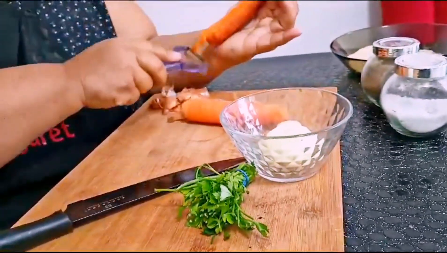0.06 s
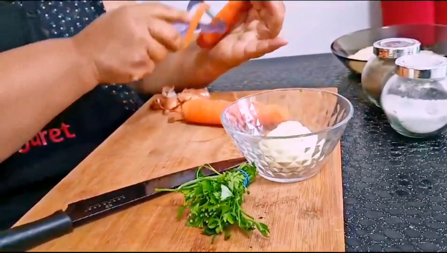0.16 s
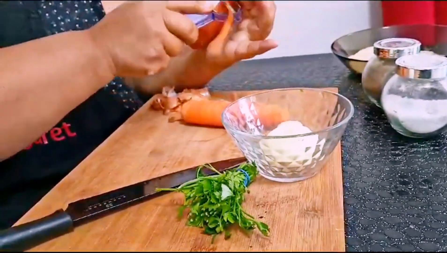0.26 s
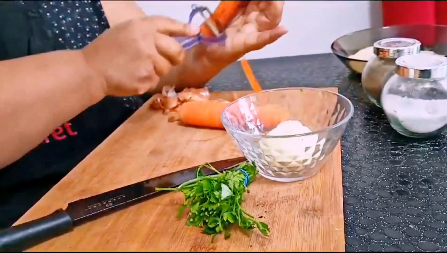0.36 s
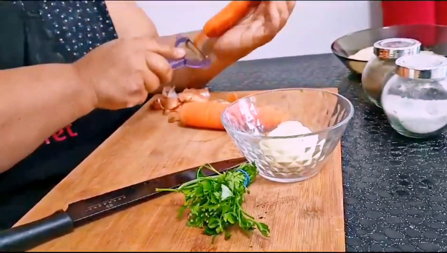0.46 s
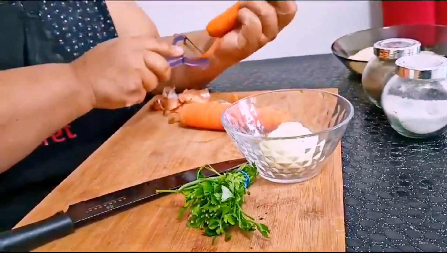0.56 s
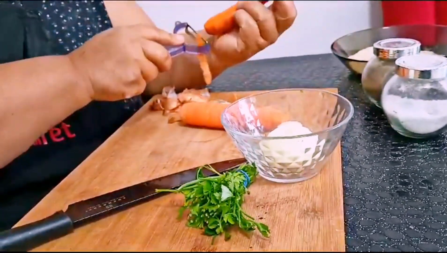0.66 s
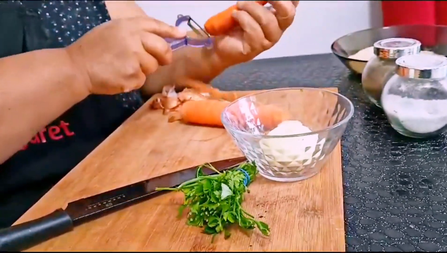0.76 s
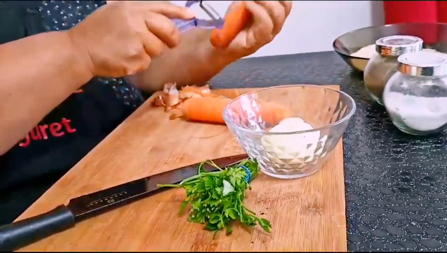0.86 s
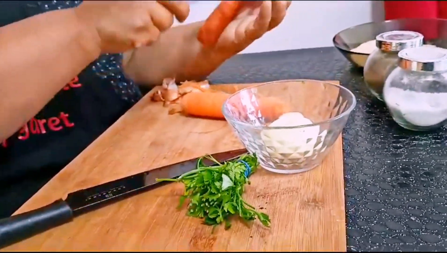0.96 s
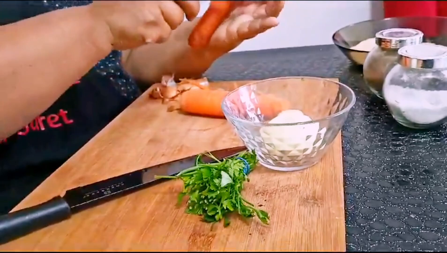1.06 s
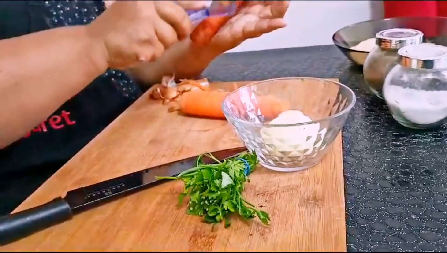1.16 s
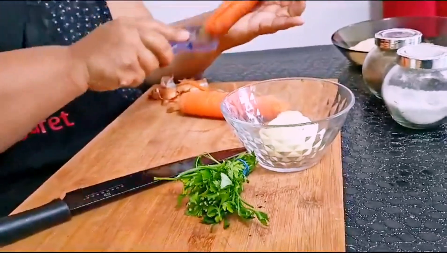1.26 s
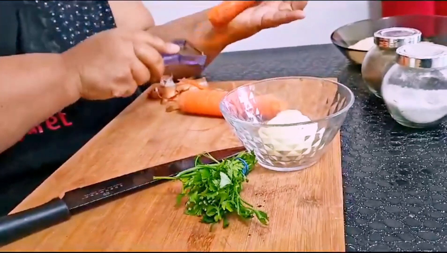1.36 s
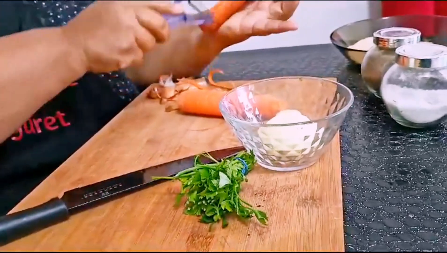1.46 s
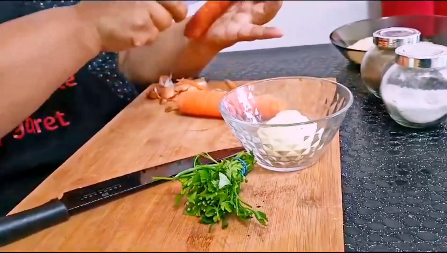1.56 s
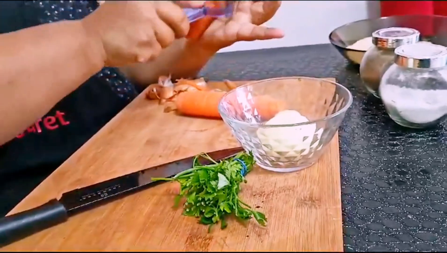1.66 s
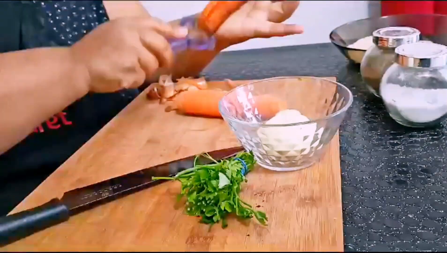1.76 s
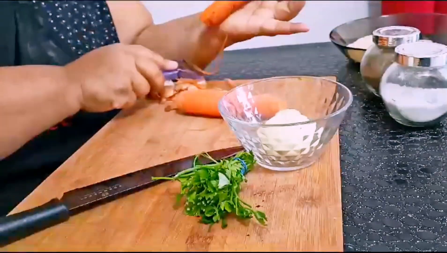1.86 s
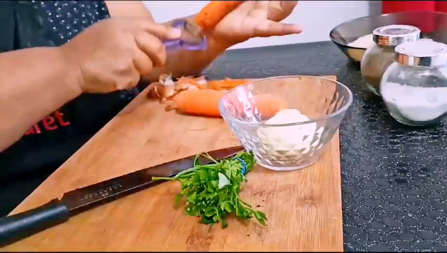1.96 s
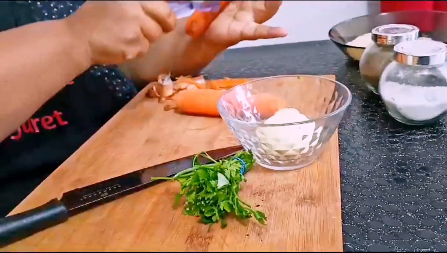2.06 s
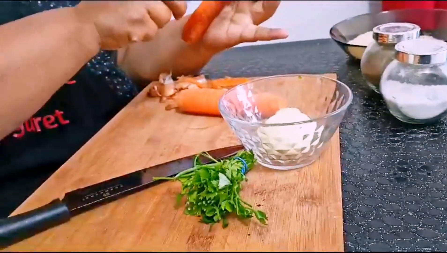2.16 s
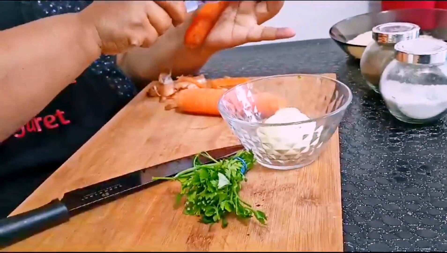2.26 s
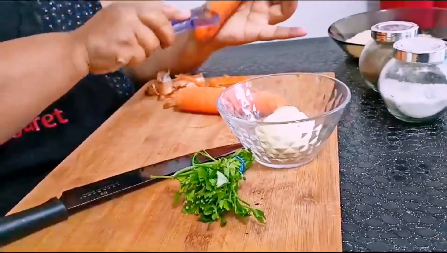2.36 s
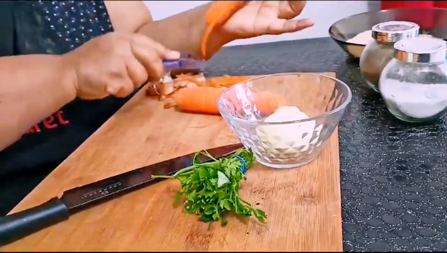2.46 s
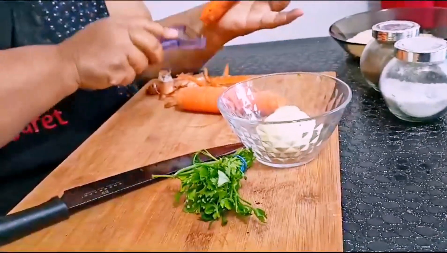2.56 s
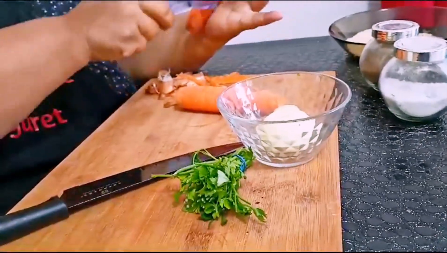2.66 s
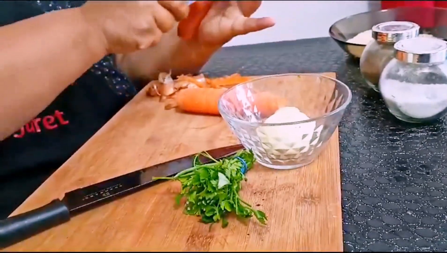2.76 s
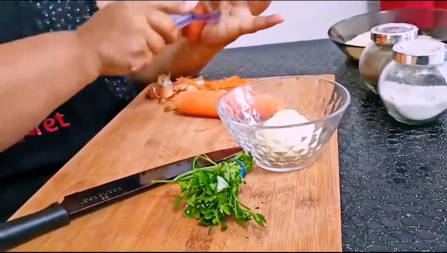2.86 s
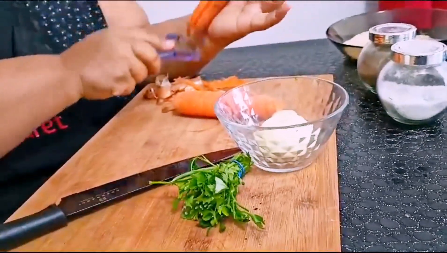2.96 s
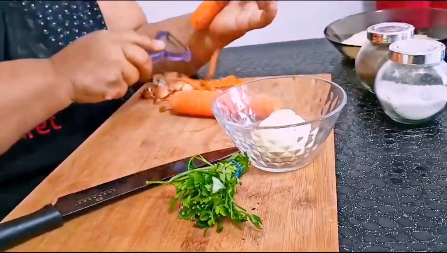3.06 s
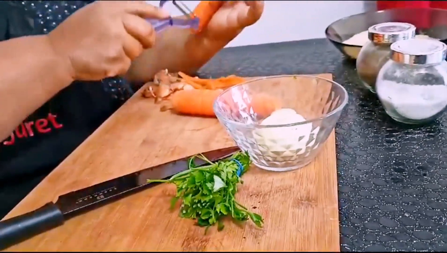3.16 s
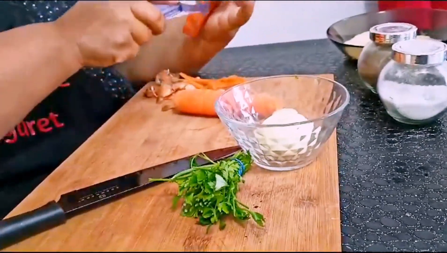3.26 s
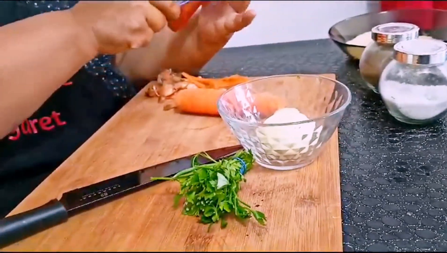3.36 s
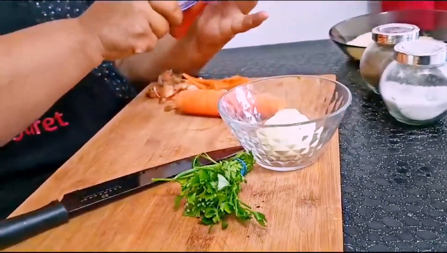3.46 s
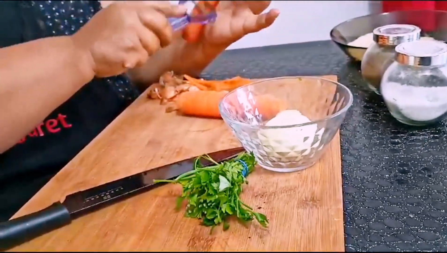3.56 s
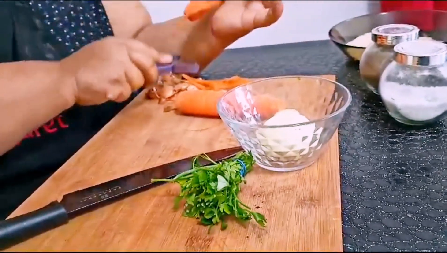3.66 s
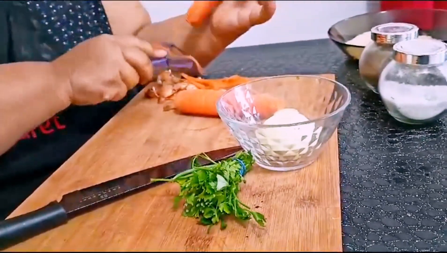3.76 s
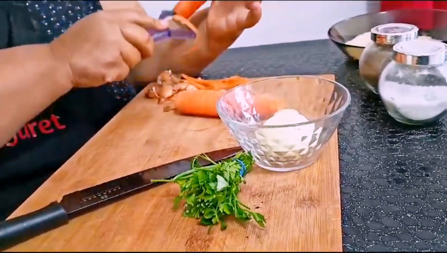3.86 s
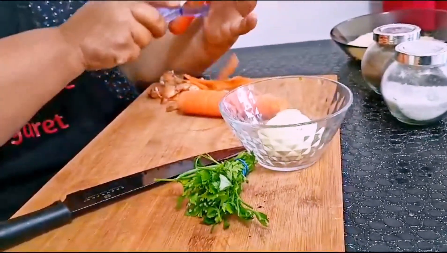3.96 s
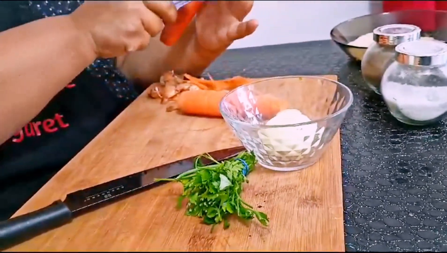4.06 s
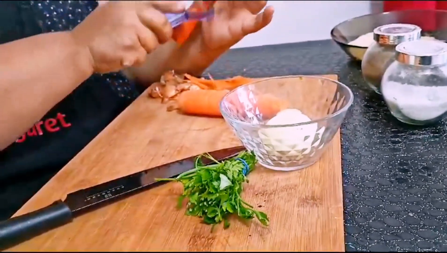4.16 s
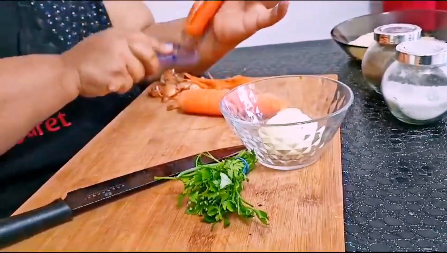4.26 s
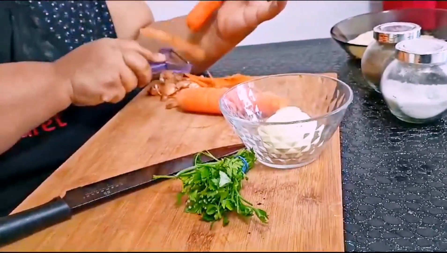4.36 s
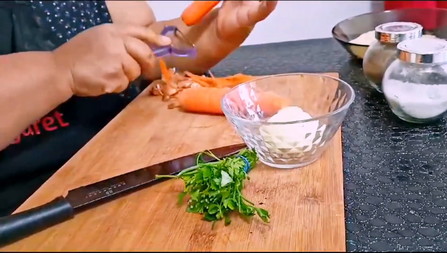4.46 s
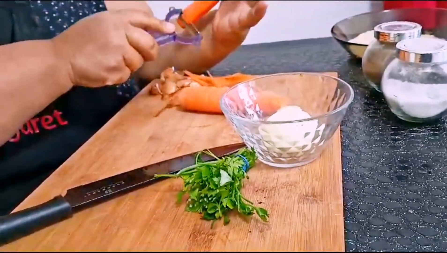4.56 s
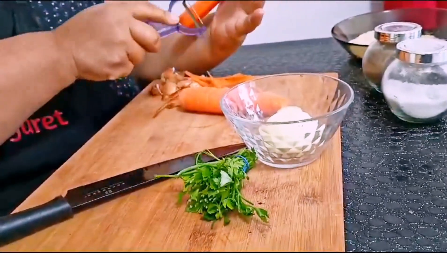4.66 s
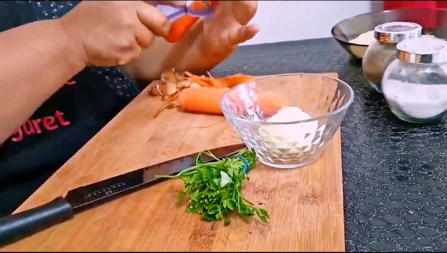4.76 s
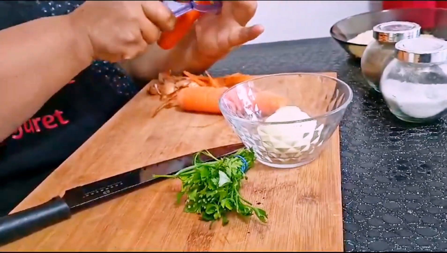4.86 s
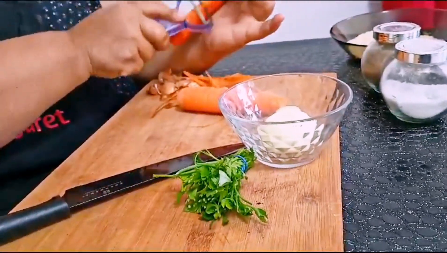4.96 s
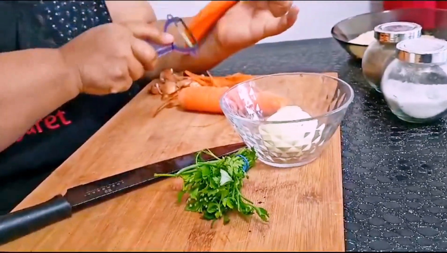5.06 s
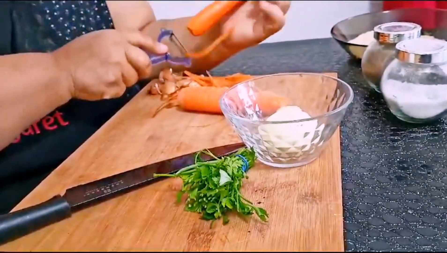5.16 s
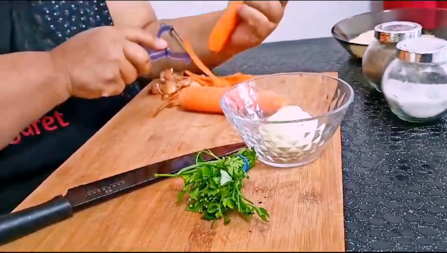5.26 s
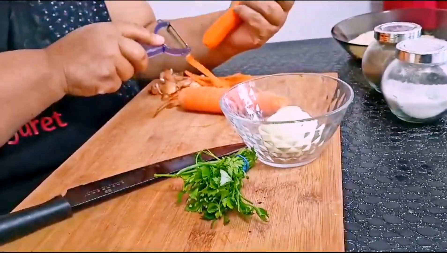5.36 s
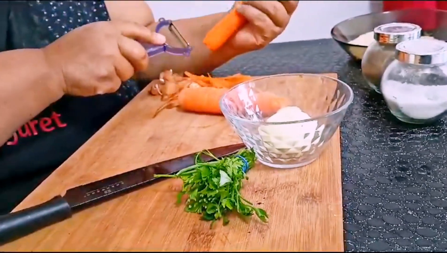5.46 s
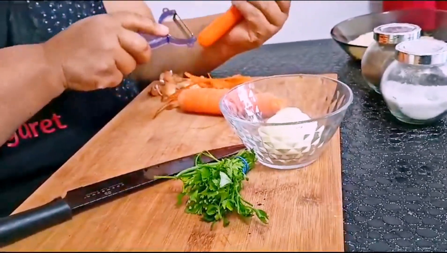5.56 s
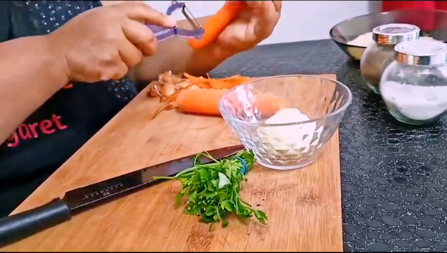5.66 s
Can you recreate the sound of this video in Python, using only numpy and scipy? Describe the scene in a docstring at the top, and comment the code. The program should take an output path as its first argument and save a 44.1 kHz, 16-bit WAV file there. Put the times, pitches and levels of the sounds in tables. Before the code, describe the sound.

Rhythmic juicy scrapes and clacks of a loose peeler blade on a carrot, with peel pattering onto wood and a faint appliance hum.

```python
"""A short wet rasp and a bright snap: a swivel peeler flicks off a carrot in a small kitchen.
Stroke after stroke the loose blade clacks onto the carrot, rasps through the skin with a juicy fizz
and the odd squeak, and snaps back as it leaves the tip. In between it rattles, strips of peel patter
onto a wooden board, and the board takes one dull tap. An appliance hums underneath, and a noise
suppressor turns the pauses down."""
import sys
import numpy as np
from scipy import signal
from scipy.fft import rfft, irfft, next_fast_len
from scipy.io import wavfile
from scipy.ndimage import uniform_filter1d

SR = 44100
rng = np.random.default_rng(int(sys.argv[2]) if len(sys.argv) > 2 else 0)


def pcm_store(signal):
    """Save signal as 16-bit PCM."""
    levels = np.round(np.clip(np.atleast_2d(signal), -1, 1) * 32767)
    wavfile.write(sys.argv[1], SR, levels.astype(np.int16).T)


N = 251487


def amp(db):
    """Decibels to gain."""
    return 10 ** (np.asarray(db) / 20)


def unit(x):
    """Scales to rms 1."""
    return x / np.sqrt(np.mean(x ** 2) + 1e-20)


def curve_at(points, hz):
    """Reads a breakpoint curve on a log-frequency axis."""
    f, value = np.transpose(points)
    return np.interp(np.log(hz + 1), np.log(f + 1), value)


def add(mix, s, sound):
    """Mixes a sound in at s seconds."""
    start = round(s * SR)
    sound = sound[max(-start, 0):]
    part = mix[max(start, 0):][:len(sound)]
    part += sound[:len(part)]


def colour(x, eq):
    """Applies an EQ curve of f/Hz, level/dB points."""
    size = next_fast_len(len(x) + 2048)
    gain = amp(curve_at(eq, np.fft.rfftfreq(size, 1 / SR)))
    return irfft(rfft(x, size) * gain, size)[:len(x)]


def drift(size, hz):
    """Smooth random modulation, rms about 1, moving at rates up to about hz."""
    span = next_fast_len(size + SR // 4)
    f = np.fft.rfftfreq(span, 1 / SR)
    spectrum = rfft(rng.standard_normal(span)) / (1 + (f / hz) ** 4)
    return unit(irfft(spectrum, span))[:size]


def resonate(x, hz, *widths_hz):
    """Resonators in series, one for each width, on a pitch that may glide."""
    turn = np.exp(2j * np.pi * np.cumsum(hz * np.ones(len(x))) / SR)
    for width in widths_hz:
        r = np.exp(-np.pi * width / SR)
        x = 2 * (turn * signal.lfilter([1 - r], [1, -r], x / turn)).real
    return x


def crackle(size, per_s, spread_db):
    """A random train of tiny clicks, a few much louder than the rest."""
    strengths = amp(spread_db * np.minimum(rng.exponential(1, size), 4))
    return unit(strengths * rng.choice([-1, 1], size) * (rng.random(size) < per_s / SR))


def appliance(air_db=-60.5, phase_wander=0.2):
    """The background bed: three wavering orders of a motor over a rush of air."""
    # motor orders: f/Hz, level/dB, waver/dB
    orders = [(143.6, -61.5, 1.5), (214.7, -56, 1.5), (287, -71.5, 3)]
    # EQ of the air: f/Hz, level/dB
    air_eq = [(20, -45), (40, -24), (65, -3.5), (100, -1.5), (160, 0), (300, -2.5), (480, -3), (800, -14.5),
              (1300, -21), (1600, -20), (1770, -12), (1980, -21.5), (2500, -23), (4500, -27), (6000, -33.5),
              (7500, -24), (10000, -35), (15500, -29.5)]
    t = np.arange(N) / SR
    hum = np.zeros(N)
    for hz, db, waver_db in orders:
        peak = np.sqrt(2) * amp(db + waver_db * drift(N, 9.8))
        hum += peak * np.sin(2 * np.pi * hz * t + phase_wander * waver_db * drift(N, 2.9))
    return hum + amp(air_db) * unit(colour(rng.standard_normal(N), air_eq))


def kitchen(x, wet_db=-2.0, onset_s=0.0028):
    """Small-room reverb: a dense tail in which each band dies at its own speed."""
    # reverb bands: f/Hz, t60/s, level/dB
    bands = [(200, 0.6, -3.5), (990, 0.44, -2.5), (2960, 0.37, 0.5), (6350, 0.33, -2.5), (7160, 0.29, 2.5),
             (10050, 0.27, -3.5), (15000, 0.23, 0.5)]
    decay_times, tail_eq = np.array(bands)[:, :2], np.array(bands)[:, ::2]
    t = np.arange(SR // 2) / SR
    hz, frame_s, noise = signal.stft(rng.standard_normal(len(t)), SR, nperseg=256)
    fade = amp(-60 * frame_s / curve_at(decay_times, hz)[:, None])
    tail = signal.istft(noise * fade, SR, nperseg=256)[1][:len(t)]
    tail *= 1 - np.exp(-(t / onset_s) ** 2)
    response = amp(wet_db) * colour(tail / np.linalg.norm(tail), tail_eq)
    return signal.fftconvolve(x, response)[:N]


def knock(level_db):
    """A dull tap rings the wooden board briefly."""
    # board modes: f/Hz, level/dB, t60/s
    modes = [(480, -20, 0.0094), (910, -9, 0.011), (1450, -2, 0.012), (1640, -9, 0.016),
             (4500, -4.5, 0.019)]
    t = np.arange(SR // 10) / SR
    return sum(amp(level_db + db - 60 * t / t60) * np.sin(2 * np.pi * hz * t) for hz, db, t60 in modes)


def peel(db, decay_s, slap_s=0.0045, attack_s=0.00047):
    """A wet strip slaps down and settles with a fading patter."""
    # EQ of peel on wood: f/Hz, level/dB
    patter_eq = [(300, -15), (800, 1.5), (2000, -0.5), (5000, -1.5), (6000, -4), (7500, 3), (11000, -1),
                 (15000, -5)]
    t = np.arange(SR // 2) / SR
    patter = unit(colour(crackle(len(t), per_s=880, spread_db=4.5), patter_eq))
    envelope = (np.exp(-t / decay_s) + np.exp(-t / slap_s)) * (1 - np.exp(-t / attack_s))
    return amp(db) * patter * envelope


def squeak(length_s, start_hz, end_hz, db, width_hz=260):
    """Fast, irregular stick-slip on the wet skin gives a fuzzy, gliding tone."""
    size = round(length_s * SR)
    tone = resonate(rng.standard_normal(size), np.linspace(start_hz, end_hz, size), width_hz, width_hz)
    return amp(db) * unit(tone * signal.windows.tukey(size, 0.5))


def squelch(size, low_hz=1550, high_hz=5000, width_hz=220, wander=0.048, swell_db=5.5, count=5):
    """Pockets of juice under the strip ring at wandering pitches, each coming and going."""
    out = np.zeros(size)
    for centre_hz in np.geomspace(low_hz, high_hz, count) * rng.uniform(0.905, 1.09, count):
        hz = centre_hz * (1 + wander * drift(size, 8.5))
        swell = amp(swell_db * drift(size, 19))
        out += swell * unit(resonate(rng.standard_normal(size), hz, width_hz, width_hz))
    return unit(out)


def clack(blow_db, thud_db, balance_db, bounce_s=0.0015, contact_s=0.00083, rise_s=0.00045,
          chatter_s=0.0067, detune=0.011, grip_db=1.2):
    """One blade pivot strikes, then the other, then both chatter; thud lifts the handle's low modes."""
    # peeler modes: f/Hz, width/Hz, level within the group/dB
    peeler_modes = [(1686, 960, 2.5), (2630, 1050, 4), (3127, 127, -2.5), (4500, 8100, -1.5),
                    (4934, 520, -4.5), (7440, 480, -5.5), (7920, 1480, -1), (10450, 590, -5.5),
                    (12000, 1600, -6.5), (14180, 770, -1), (15800, 1600, 3)]
    # crossovers between the low, middle, high and top groups of modes: f/Hz
    crossovers = [3800, 6000, 9200]
    t = np.arange(round(0.04 * SR)) / SR
    first, second = (np.exp(-age / contact_s) * (1 - np.exp(-age / rise_s))
                     for age in (t, np.maximum(t - bounce_s, 0)))
    contact = 0.73 * first + second
    modes = np.array(peeler_modes)
    group = np.searchsorted(crossovers, modes[:, 0])
    modes[:, 0] *= 1 + detune * rng.standard_normal(len(modes))  # the grip shifts from blow to blow
    modes[:, 2] += grip_db * rng.standard_normal(len(modes))
    levels_db = blow_db + np.array(balance_db) + thud_db * np.array([1, 0.65, 0, 0])
    out = np.zeros(len(t))
    for k, group_db in enumerate(levels_db):
        chatter = (0.24 if k == 0 else 0.07) * np.exp(-t / chatter_s)
        blow = (contact / contact.max() + chatter) * rng.standard_normal(len(t))
        ringing = sum(amp(db) * unit(resonate(blow, hz, width, 2 * width))
                      for hz, width, db in modes[group == k])
        out += amp(group_db) * unit(ringing)
    return out / np.sqrt(10)  # the energy sits in the first tenth


def pressure(t, landing_db, bite_s, cut_db, skid_db=-7, settle_s=0.05, swell_db=36.5):
    """Envelope of the scrape: the landing skid dies away while the cut swells and holds."""
    skid = amp(landing_db + skid_db) * np.exp(-t / settle_s)
    cut = amp(cut_db - swell_db * np.maximum(1 - t / bite_s, 0) ** 2)
    return np.hypot(skid, cut)


def scrape(t, fizz_db, thrum_db, judder=0.19, waver=0.035, thrum_growth_db=9,
           blade_hz=3050, strip_start_hz=4900, strip_end_hz=2900, sizzle_hz=13500):
    """The blade cuts skin and bursts cells in uneven slips: mid rasp, airy fizz and low thrum."""
    # EQ of the tearing skin: f/Hz, level/dB
    rasp_eq = [(200, -42), (700, -26), (1150, -7.5), (1450, -11.5), (1750, 2), (2100, 1.5), (2600, 3.5),
               (3050, 3.5), (3600, -13), (4300, -4), (5050, -3.5), (5600, -13), (6500, -16), (8500, -36)]
    # EQ of the bursting cells: f/Hz, level/dB
    fizz_eq = [(1000, -58), (5000, -27), (6200, -6.5), (6700, -7), (7300, 1), (8500, -0.5), (9600, -5),
               (10500, -2.5), (11700, -8.5), (12600, -3), (13400, -6), (14200, -5.5), (15500, 3),
               (16500, -12.5)]
    # EQ of the carrot's body: f/Hz, level/dB
    thrum_eq = [(40, -43), (150, -13), (350, -3), (520, -2), (800, -4), (1150, -6), (1500, 1.5),
                (2500, -31)]
    size = len(t)
    travel = np.linspace(0, 1, size)
    speed = np.sin(np.pi * travel ** 1.34) ** 2  # fastest past the middle
    slips = np.exp(judder * drift(size, 87))
    skin = slips * crackle(size, per_s=4500, spread_db=5.0)
    cells = slips * crackle(size, per_s=21000, spread_db=3.5)
    # the blade holds its pitch; the strip of peel rings lower as it grows longer
    strip_hz = np.linspace(strip_start_hz, strip_end_hz, size) * (1 + waver * drift(size, 20))
    strip = np.sqrt(speed) * unit(resonate(cells, strip_hz, 800, 800))
    blade = np.sqrt(2 * travel) * unit(resonate(slips * rng.standard_normal(size), blade_hz, 390, 390))
    rasp = unit(colour(skin, rasp_eq)) + 0.65 * strip + 0.67 * blade + 0.74 * squelch(size)
    wavering_hz = sizzle_hz * (1 + waver * drift(size, 16))
    sizzle = speed * unit(resonate(slips * rng.standard_normal(size), wavering_hz, 550))
    fizz = unit(colour(cells, fizz_eq)) + 0.97 * sizzle
    thrum = colour(slips * crackle(size, per_s=2500, spread_db=2.5), thrum_eq)
    thrum_gain = amp(thrum_db + thrum_growth_db * travel)  # grows towards the carrot's free tip
    sound = unit(rasp) * amp(-3.5) + unit(fizz) * amp(fizz_db - 1.5) + unit(thrum) * thrum_gain
    return sound * signal.windows.tukey(size, 0.02)


def peeling(graze_s=0.008, firm_db=-36.5, thud_per_db=0.47):
    """The dry action: clack, scrape and snap for each stroke, with the small sounds around them."""
    # strokes: landing t/s, leaving t/s, landing level/dB, time to full bite/s, cut level/dB,
    # fizz trim/dB, thrum trim/dB, snap level/dB, snap's thud boost/dB
    strokes = [(-0.2, 0.0218, -42, .12, -46.5, 5, -20, -39.5, 3),
               (0.2684, 0.485, -33.5, 0.1, -46.5, 0, -18, -34, 1.5),
               (1.1078, 1.3244, -36.5, .11, -46, 3, -18, -35.5, 0.5),
               (1.6437, 1.8331, -38.5, 0.085, -45.5, 1, -20, -32, -0.5),
               (2.269, 2.4692, -60.5, 0.19, -46.5, 1, -18, -33.5, -2),
               (2.7842, 3.009, -39.5, .11, -46, 1, -20.5, -31, -4.5),
               (3.4373, 3.6969, -44, 0.22, -44.5, -0.5, -23, -30, -6),
               (4.101, 4.3121, -64, 0.14, -46.5, -1.5, -19, -32.5, -3.5),
               (4.868, 5.1579, -46.5, 0.14, -48, 0, -14.5, -32, -4.5)]
    # rattles of the loose blade, mostly between strokes; the one at 3.432 s is the blade's first touch of a
    # double landing: t/s, level/dB, thud boost/dB
    rattles = [(0.195, -59, 3.5), (0.609, -59, -6), (1.481, -62, 7.5), (3.4324, -49, -7),
               (4.501, -69.5, 11), (4.606, -62, 0), (5.526, -67.5, -12)]
    # blade squeaks: t/s, length/s, start f/Hz, end f/Hz, level/dB
    squeaks = [(0.273, 0.019, 3600, 3250, -44), (0.274, 0.04, 2090, 1970, -51),
               (0.368, 0.17, 3090, 2920, -52), (1.195, 0.042, 7750, 7800, -54),
               (2.781, 0.038, 2260, 2090, -55), (4.938, 0.024, 3220, 3000, -57.5)]
    # peel landing on the board: t/s, level/dB, decay/s
    peels = [(0.826, -62.5, 0.063), (1.484, -61, 0.039), (3.096, -50, 0.012), (3.216, -61.5, 0.017),
             (4.075, -63, 0.01), (4.502, -65, 0.15)]
    # mode balance, blade seated on the carrot or swinging free: low/dB, middle/dB, high/dB, top/dB
    seated, free = (-5.5, -2.5, 0.5, 1.5), (-0.5, -5, 0, 2)
    mix = np.zeros(N)
    for land_s, leave_s, landing_db, bite_s, cut_db, fizz_db, thrum_db, snap_db, thud_db in strokes:
        landing_thud_db = thud_per_db * (firm_db - landing_db)  # softer landings are duller
        add(mix, land_s, clack(landing_db, landing_thud_db, seated))
        start_s = land_s - graze_s  # the edge skids just before the blade seats
        t = np.arange(start_s, leave_s, 1 / SR) - start_s
        add(mix, start_s, scrape(t, fizz_db, thrum_db) * pressure(t, landing_db, bite_s, cut_db))
        add(mix, leave_s, clack(snap_db, thud_db, free))
    for s, db, thud_db in rattles:
        add(mix, s, clack(db, thud_db, free))
    for s, *settings in squeaks:
        add(mix, s, squeak(*settings))
    for s, db, decay_s in peels:
        add(mix, s, peel(db, decay_s))
    add(mix, 3.094, knock(level_db=-38.5))
    return mix


def scene(directions=2):
    """The peeler radiates differently each way: one way is heard direct, all of them fill the room."""
    ways = [peeling() for _ in range(directions)]
    reverb = sum(kitchen(way) for way in ways) / np.sqrt(directions)
    return (ways[0] + reverb + appliance())[None]


def record(dry, split_hz=900, shut_db=-72, bass_open_db=-47, treble_open_db=-58,
           bass_depth_db=12.0, treble_depth_db=5, bass_lag_s=0.027, cutoff_hz=15900):
    """A noise suppressor ducks the pauses, the bass deeper and more slowly; then a steep low-pass."""
    x = dry[0]
    bass = signal.sosfiltfilt(signal.butter(2, split_hz, fs=SR, output="sos"), x)
    treble = x - bass
    key_db = 10 * np.log10(abs(uniform_filter1d(treble ** 2, size=300)) + 1e-12)  # keys both bands
    treble_shut = np.interp(key_db, [shut_db, treble_open_db], [1, 0])
    bass_shut = np.interp(key_db, [shut_db, bass_open_db], [1, 0])
    lag = np.exp(-1 / (bass_lag_s * SR))
    bass_shut = signal.lfilter([1 - lag], [1, -lag], bass_shut, zi=bass_shut[:1] * lag)[0]
    ducked = bass * amp(-bass_depth_db * bass_shut) + treble * amp(-treble_depth_db * treble_shut)
    low_pass = signal.firwin(401, cutoff_hz, window=("kaiser", 8), fs=SR)
    return signal.oaconvolve(ducked, low_pass, "same")[None]


dry = scene()
out = record(dry)
pcm_store(out)
```